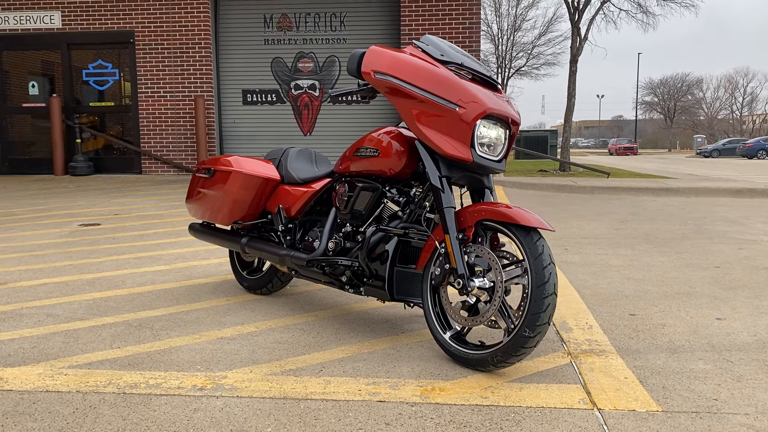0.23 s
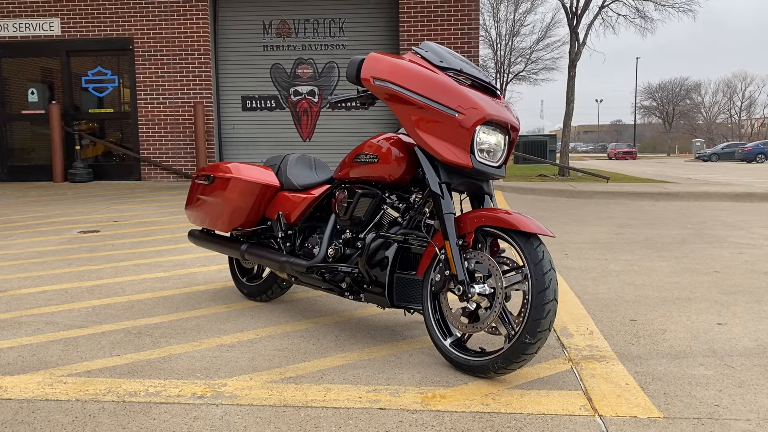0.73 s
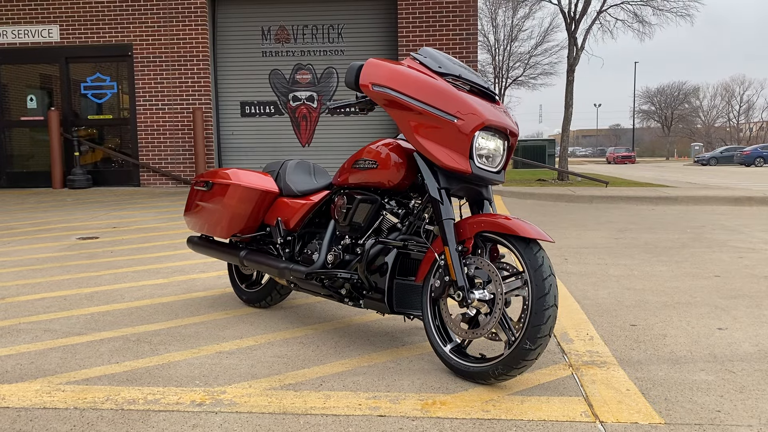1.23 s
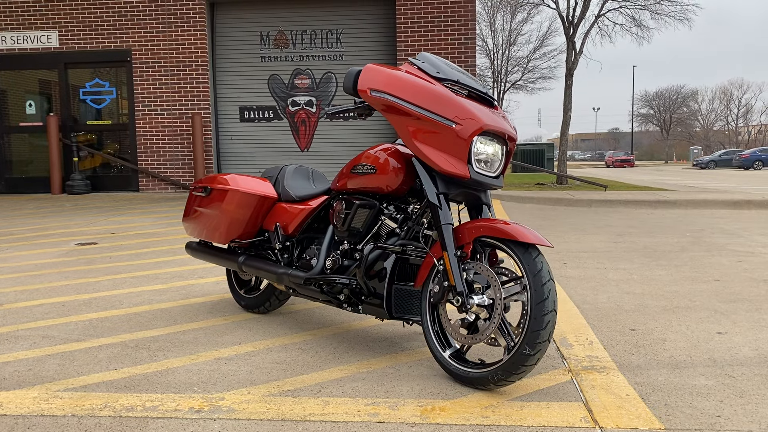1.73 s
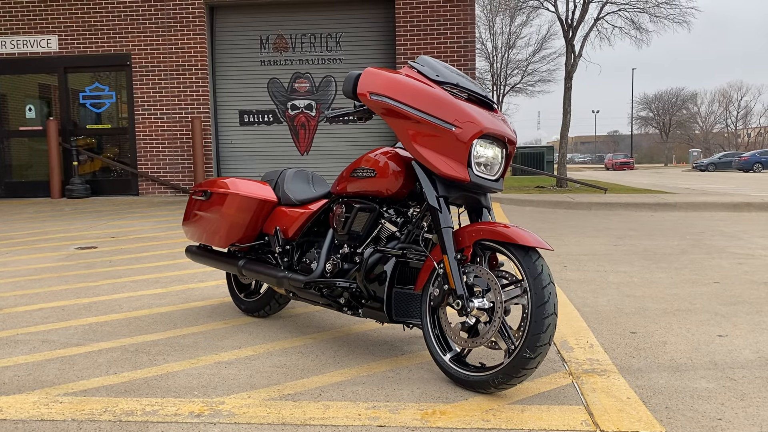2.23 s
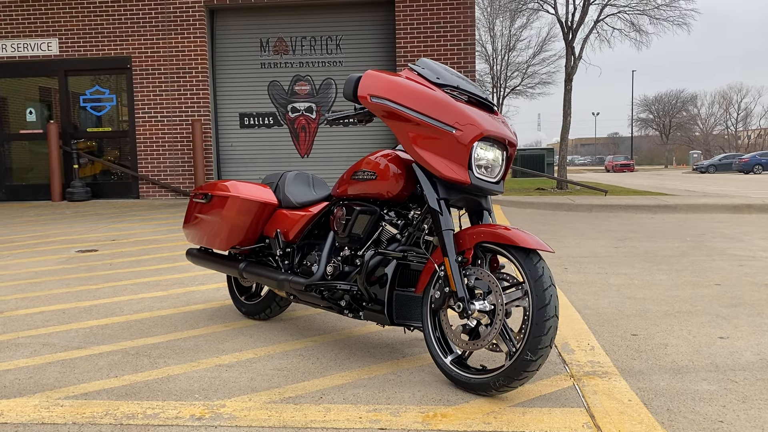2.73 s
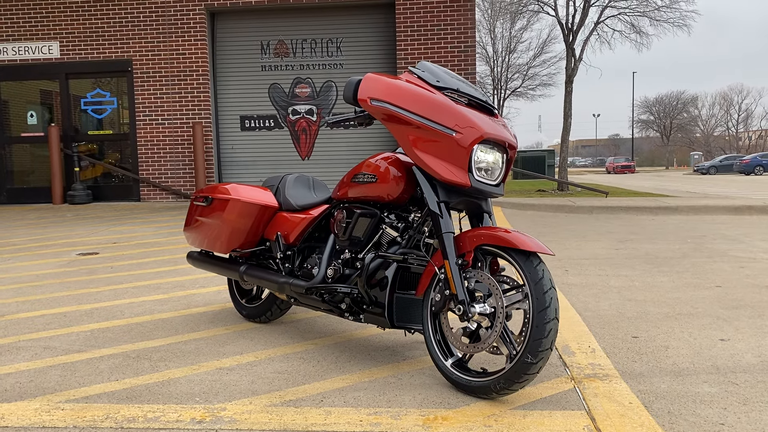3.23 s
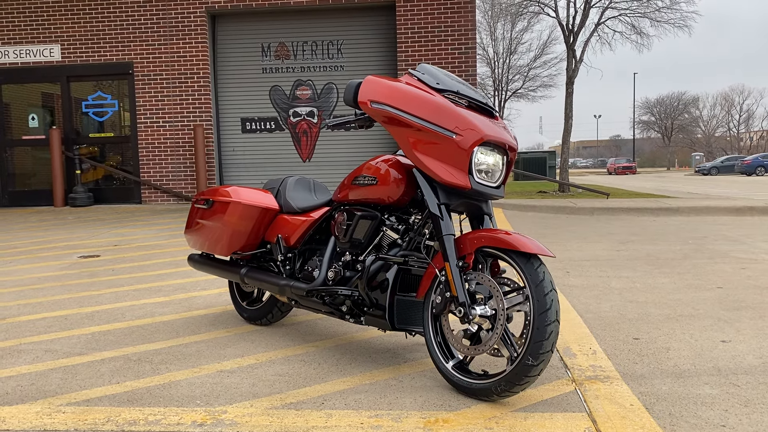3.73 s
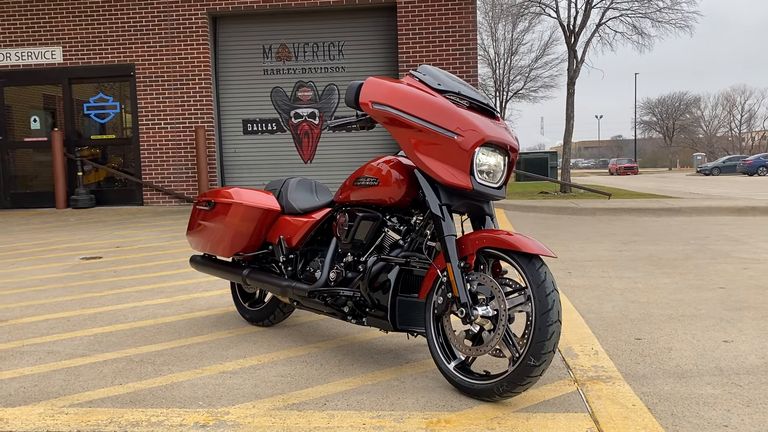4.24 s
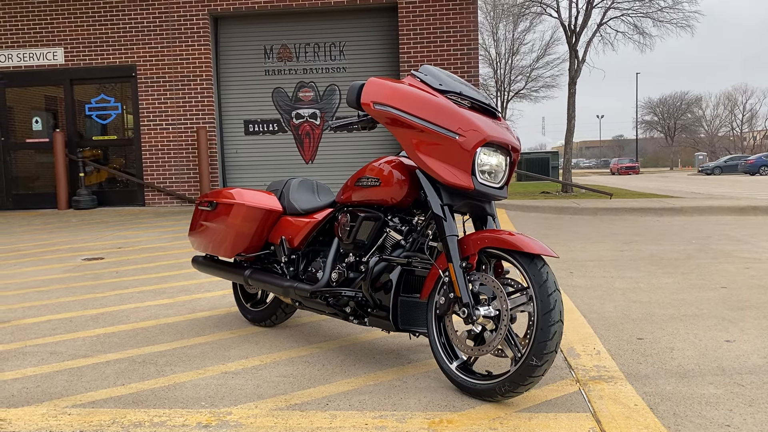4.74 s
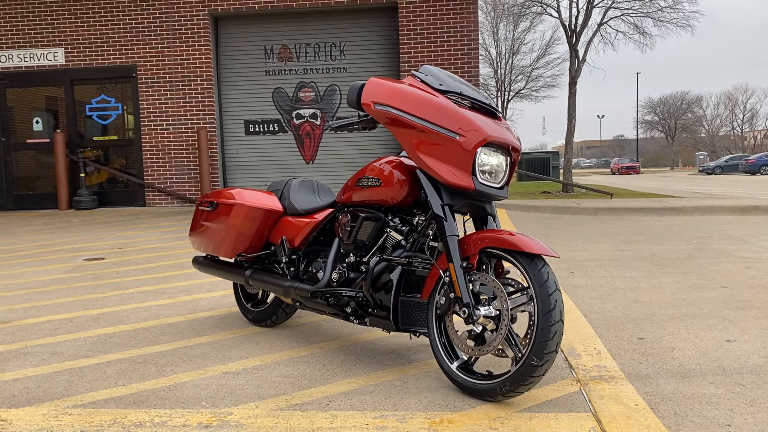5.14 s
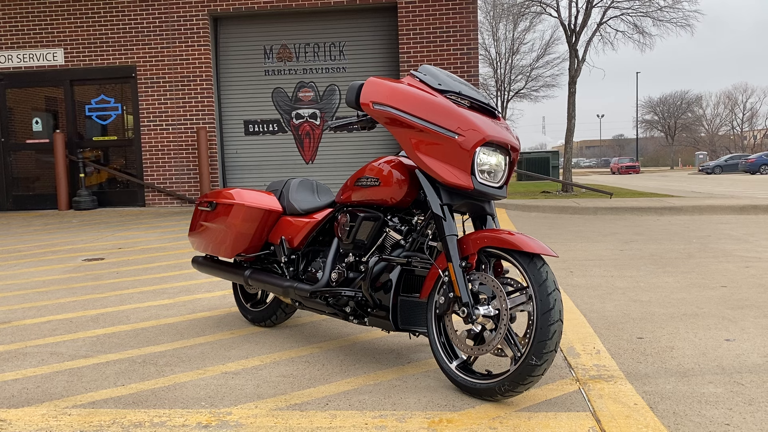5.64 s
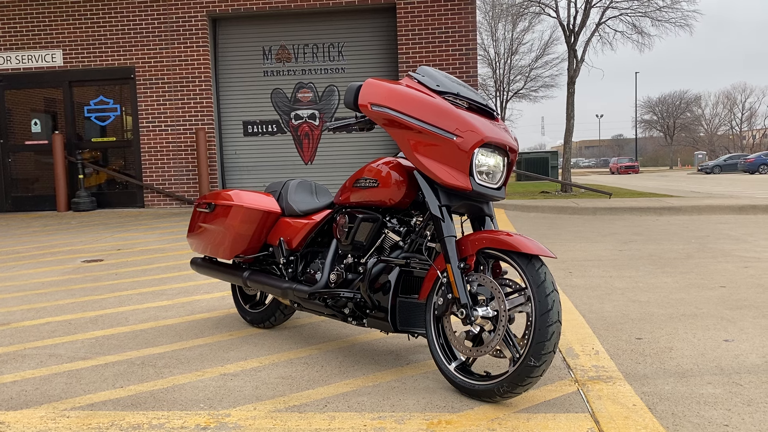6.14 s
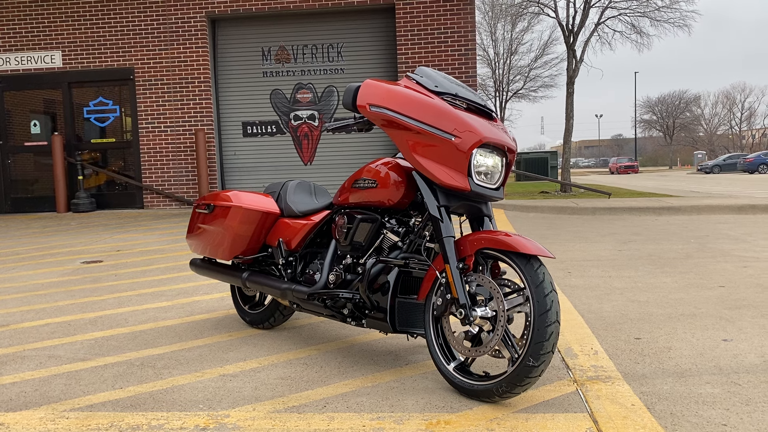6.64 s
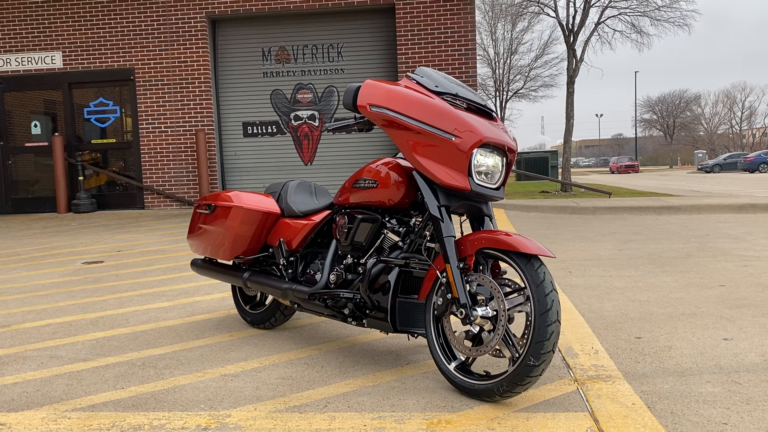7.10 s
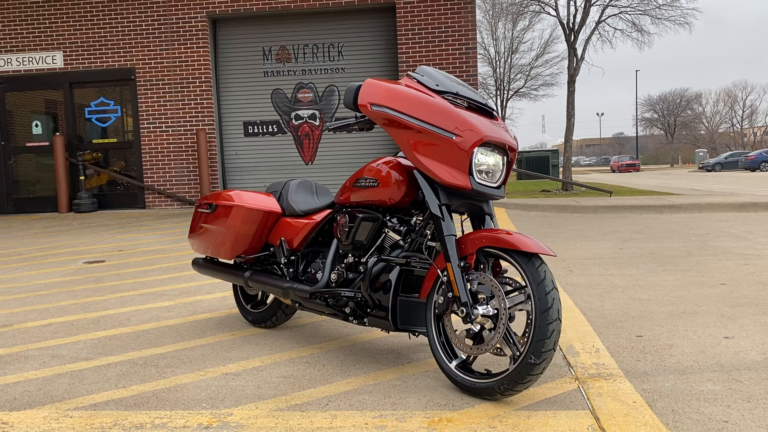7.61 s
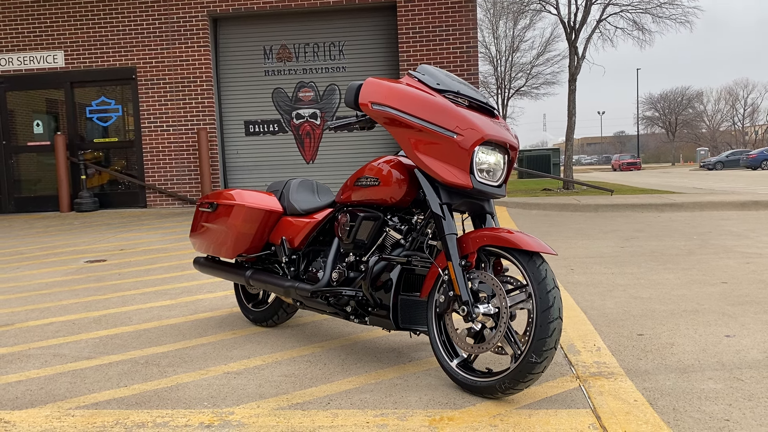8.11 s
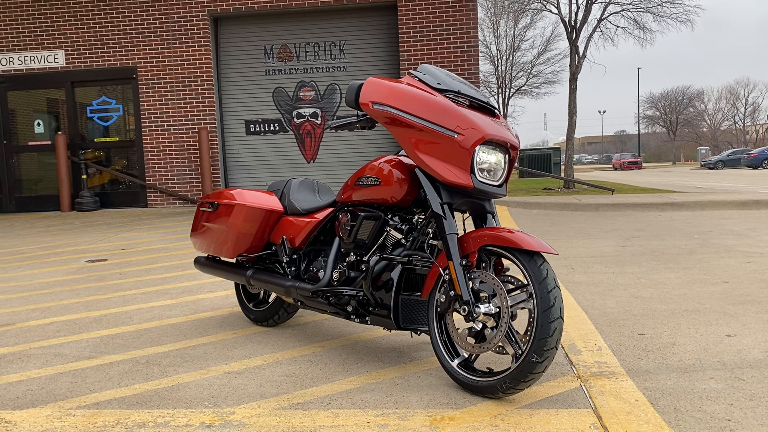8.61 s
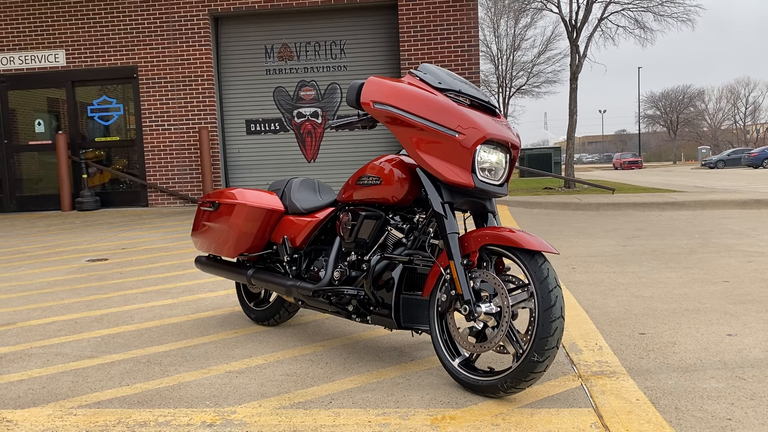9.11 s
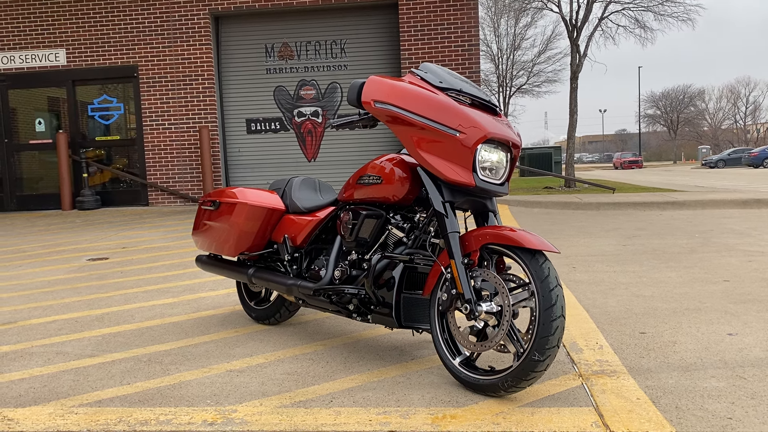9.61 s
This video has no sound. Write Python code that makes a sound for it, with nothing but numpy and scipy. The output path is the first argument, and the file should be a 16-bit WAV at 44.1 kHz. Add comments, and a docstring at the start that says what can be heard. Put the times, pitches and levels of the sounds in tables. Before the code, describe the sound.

From 0 s a large twin-cylinder motorcycle is already idling nearby on an open concrete lot, and it never revs or stops. Two uneven low exhaust pulses repeat about eight and a half times a second, a quick loping throb with slight wandering. Over it sit hollow metallic case knocks, rapid dry valve ticks, occasional sharper bright ticks, grainy hiss and faint rough whines. Breeze rumbles on the stereo microphone, with bass swells and short soft thumps dropping in pitch, swaying left and right; notable buffets come near 1.7, 3 and 4.3 s and thickly from 5 to 5.5 s. At about 5.5 s the bass abruptly thins and the rumble sinks, leaving lighter clatter with weaker thumps. Around 8 s most of the low throb returns, with milder wind swells, and the steady idle continues until the cut at nearly 10 s.

```python
"""A big V-twin motorcycle idles on an open concrete lot, heard at two microphone ports.
All along, two uneven firings a cycle pulse through ringing pipe modes; the cases knock in short resonances,
valve gear ticks in bursts of noise, and the engine hisses and whines. From the start a breeze of band-passed
noise rumbles, bass tones swell, and thumps of falling pitch buffet the ports. At about 5.5 s the bass thins
and the rumble sinks; near 8 s most of the bass comes back and the engine idles on to the end."""
import sys
import numpy as np
from scipy import signal
from scipy.fft import rfft, irfft, next_fast_len
from scipy.io import wavfile
from scipy.ndimage import uniform_filter1d

SR = 44100
rng = np.random.default_rng(int(sys.argv[2]) if len(sys.argv) > 2 else 0)


def digitize_waveform(pressure):
    """Quantize a signal to 16-bit integers and store it at the path in sys.argv[1].

    Rows of a 2-D input are taken as channels; values are limited to [-1, 1].
    """
    field = np.atleast_2d(pressure).T
    bounded = np.clip(field, -1, 1)
    quanta = np.round(bounded * 32767).astype(np.int16)
    wavfile.write(sys.argv[1], SR, quanta)


N = 434804
TIME = np.arange(N) / SR
SIZE = next_fast_len(N + SR // 4, real=True)   # transform length with room for tails

# strength of the breeze on the ports before gusts: (t/s, rumble level/dB, flutter level/dB)
BREEZE = [(0, -23, -30), (.88, -22, -29), (1.26, -22, -28), (1.67, -22, -29), (1.9, -23.5, -32),
          (2.5, -24, -29), (3.0, -22.5, -30), (3.32, -22, -29), (3.75, -19.5, -30), (4.15, -23, -26),
          (4.5, -23, -32), (4.95, -21.5, -33), (5.07, -17.5, -25), (5.51, -26.5, -27.5), (5.55, -31.5, -33),
          (6.04, -29, -41.5), (6.23, -33.5, -50), (6.81, -26.5, -36), (7.85, -33.5, -42.5),
          (8.1, -24, -35.5), (9.86, -24, -31)]


def amp(db):
    """dB to gain."""
    return 10 ** (np.asarray(db) / 20)


def rms_one(x):
    """Scaled to rms 1."""
    return x / np.sqrt(np.mean(x ** 2) + 1e-20)


def in_time(rows):
    """Each column of a table as a curve over all samples."""
    s, *columns = np.transpose(rows)
    return [np.interp(TIME, s, column) for column in columns]


def resonance(x, hz, width_hz):
    """Two-pole band-pass with gain 1 on top."""
    r = np.exp(-np.pi * width_hz / SR)
    poles = [1, -2 * r * np.cos(2 * np.pi * hz / SR), r * r]
    return signal.lfilter([(1 - r * r) / 2, 0, (r * r - 1) / 2], poles, x)


def shaped(x, points):
    """Coloured by (f/Hz, level/dB) points, joined along a logarithmic pitch axis."""
    hz, db = np.transpose(points)
    bins = np.maximum(np.fft.rfftfreq(SIZE, 1 / SR), 1)
    gain = amp(np.interp(np.log(bins), np.log(hz), db))
    return irfft(rfft(x, SIZE) * gain, SIZE)[..., :N]


def band(x, low_hz, high_hz):
    """Butterworth band-pass."""
    return signal.sosfilt(signal.butter(3, [low_hz, high_hz], "band", fs=SR, output="sos"), x)


def cut(order, x, hz, kind="low"):
    """Butterworth low-pass or high-pass."""
    return signal.sosfilt(signal.butter(order, hz, kind, fs=SR, output="sos"), x)


def drift(hz):
    """Random wander with rms 1: noise through two one-pole low-passes at this frequency."""
    r = np.exp(-2 * np.pi * hz / SR)
    wander = signal.lfilter([1], [1, -2 * r, r * r], rng.standard_normal(N + SR))
    return rms_one(wander[SR:])   # the first second lets the filter settle


def crank_cycles():
    """The crank turns at a steady idle plus a slow hunting that runs it ahead by part of a cycle."""
    cycles_per_s = 8.44
    # idle hunting: (t/s, lead over a steady idle/cycles)
    hunting = [(0, .109), (.38, .13), (.96, .064), (1.44, .128), (2.16, .102), (2.4, .078), (2.64, .105),
               (3.24, .094), (3.6, .048), (4.1, .104), (4.8, .085), (5.28, .088), (5.6, .108), (6.3, .101),
               (6.8, .132), (7.75, .072), (8.85, .134), (9.36, .119), (9.86, .162)]
    return cycles_per_s * TIME + in_time(hunting)[0]


CYCLE = crank_cycles()


def each_cycle(fraction, spread_db, jitter_s):
    """One click a cycle at a crank position, uneven in strength and time."""
    chance = rng.standard_normal((int(CYCLE[-1]) + 1, 2))
    s = np.interp(np.arange(len(chance)) + fraction, CYCLE, TIME, left=-1, right=-1)
    s = s + jitter_s * chance[:, 0]
    heard = (s > 0) & (s < TIME[-1])
    clicks = np.full(N, 1e-18)   # a trace above zero keeps the filters fast
    clicks[(s[heard] * SR).astype(int)] = amp(spread_db * chance[heard, 1])
    return clicks


def exhaust():
    """Each firing sends a soft pulse into the pipe resonances; neighbouring modes start with opposite sign."""
    level_db, spread_db, jitter_s, pulse_cut_hz = -18.8, 1.1, .0006, 350
    # two cylinders about 310 degrees apart: (position/cycle, level/dB)
    firings = [(.975, 0), (.401, -3.5)]
    # exhaust pipe modes: (f/Hz, width/Hz, level/dB)
    pipe_modes = [(38, 4, -3), (58.6, 5.9, 0), (94, 8.9, -5.8), (118.2, 4, -14)]
    clicks = sum(amp(db) * each_cycle(at, spread_db, jitter_s) for at, db in firings)
    pulses = cut(2, clicks, pulse_cut_hz)
    modes = [amp(db) * resonance(pulses, hz, width_hz) for hz, width_hz, db in pipe_modes]
    return amp(level_db) * rms_one(sum(modes[::2]) - sum(modes[1::2]))


def knocks():
    """Soft blows inside the cases: each swells and dies in one mode, so the resonance acts twice."""
    # blows and the modes they strike: (position/cycle, f/Hz, width/Hz, level/dB)
    case_blows = [(.205, 491, 50, -25.5), (.71, 493, 62, -33.5), (.55, 493, 62, -37), (.35, 595, 60, -34.5),
                  (.52, 595, 70, -34.5), (.97, 595, 70, -37), (.68, 595, 70, -38), (.96, 740, 80, -32.5),
                  (.4, 740, 100, -32), (.83, 740, 80, -36.5), (.97, 880, 80, -37.5), (.14, 880, 80, -38.5),
                  (.75, 880, 80, -39.5), (.74, 1150, 90, -35), (.15, 1150, 90, -40),
                  (.27, 1480, 110, -37.5), (.3, 1850, 120, -41), (.04, 1850, 120, -44.5),
                  (.16, 1850, 120, -41.5), (.29, 2350, 130, -41.5)]
    # a blow rings flat and short, true and long, or sharp: (pitch ratio, width ratio)
    detunings = [(.98, 1.1), (1, .85), (1.02, 1)]
    out = 0
    for at, hz, width_hz, db in case_blows:
        blow = each_cycle(at, spread_db=1.6, jitter_s=0.00159)
        choices = rng.integers(0, len(detunings), int(CYCLE[-1]) + 1)
        dealt = choices[CYCLE.astype(int)]   # one detuning for each cycle
        peak = 2 * np.pi * width_hz / SR / np.e   # height of the double resonance's ring after a unit click
        for k, (ratio, broad) in enumerate(detunings):
            ring = blow * (dealt == k) + 1e-18
            for _ in range(2):
                ring = resonance(ring, hz * ratio, width_hz * broad)
            out = out + amp(db) / peak / np.sqrt(broad) * ring
    return out


def valve_ticks(noise):
    """Every valve contact lets through a burst of noise, uneven in each band on its own."""
    # valve contacts: (position/cycle, decay/s, then level/dB against the noise in each tick band)
    contacts = [(.96, .015, -3, -1, -1), (.03, .006, -4, 6, 1), (.17, .008, -3, 2, 0), (.29, .012, 5, 9, 9),
                (.44, .015, -4, -3, -3), (.57, .011, 2, 8, 8), (.735, .008, -1, 2, -3),
                (.9, .006, -9, 3, 10)]
    # tick bands: (low f/Hz, high f/Hz)
    tick_bands = [(2600, 7200), (7200, 12500), (12500, 16500)]
    bursts = 0
    for k, (low_hz, high_hz) in enumerate(tick_bands):
        gate = 0
        for at, decay_s, *db in contacts:
            clicks = amp(db[k]) * each_cycle(at, spread_db=2.4, jitter_s=0.0045)
            gate = gate + signal.lfilter([1], [1, -np.exp(-1 / (decay_s * SR))], clicks)
        gate = uniform_filter1d(gate, size=130, origin=64)   # the burst takes three milliseconds to rise
        bursts = bursts + band(gate * noise, low_hz, high_hz)
    return bursts


def sharp_ticks():
    """Hard contacts give brief bright bursts: chosen loud ones, and weak uneven ones every cycle."""
    decay_s, hard_db, hard_spread_db = 0.011, -56, 3.5
    # the sharpest single ticks: (t/s, level/dB)
    single_ticks = [(0.855, -46), (1.1278, -43), (1.2391, -41), (2.277, -43), (2.5461, -41), (3.3423, -44),
                    (3.4645, -42), (4.5585, -42), (5.6231, -45), (6.5695, -43), (7.25, -43), (7.4889, -44),
                    (8.8189, -44), (9.4135, -42)]
    # crank positions of the weaker hard contacts: position/cycle
    hard_positions = (.29, .58)
    s, db = np.transpose(single_ticks)
    clicks = amp(hard_db) * sum(each_cycle(at, hard_spread_db, jitter_s=0.0015) for at in hard_positions)
    clicks[(s * SR).astype(int)] = amp(db)
    gate = signal.lfilter([1], [1, -np.exp(-1 / (decay_s * SR))], clicks)
    return gate * rms_one(band(rng.standard_normal(N), 6000, 12800))


def engine_whines():
    """Narrow resonances turn noise into rough tones and ringing bands, each rattling in strength on its own."""
    waver_db, waver_hz = 2.5, 18
    # noisy tones and ringing bands: (f/Hz, width/Hz, level/dB)
    tones = [(737, 20, -49), (1062, 25, -51), (1165, 20, -48.5), (1200, 120, -46.5), (1860, 120, -48),
             (2432, 60, -52), (3806, 50, -64), (4195, 20, -63), (5655, 50, -67), (6000, 15, -75),
             (6255, 55, -68)]
    white = rng.standard_normal((2, N))
    out = 0
    for hz, width_hz, db in tones:
        rattling = white * amp(waver_db * drift(waver_hz))
        out = out + amp(db) * rms_one(resonance(rattling, hz, width_hz))
    return out


def swelling(hiss):
    """Lumpy lowest hiss, then ranges split by low-passes that each swell and sink on their own."""
    deep_hz, deep_swell_db, deep_swell_hz = 380, 3, 14
    swell_db, swell_hz = 1.2, 20
    deep = cut(2, hiss, deep_hz)
    rest = hiss + deep * (amp(deep_swell_db * (drift(deep_swell_hz) - .5)) - 1)
    out = 0
    for split_hz in (700, 1400, 2800):
        low = cut(1, rest, split_hz)
        out = out + low * amp(swell_db * drift(swell_hz))
        rest = rest - low
    return out + rest * amp(2.5 * drift(23.0))   # the top range swells more than the middle ranges


def clatter():
    """Swelling hiss, valve bursts cut from a second hiss, and whines; two unrelated strands of each."""
    # colour of engine hiss and clatter: (f/Hz, level/dB per Hz before swells and bursts)
    hiss_colour = [(150, -54), (330, -63), (480, -61.5), (600, -61.5), (900, -64), (1100, -66.5),
                   (1420, -67), (1560, -66), (1720, -72), (1850, -69.5), (2250, -74), (2700, -82),
                   (4200, -83), (5000, -88.5), (6800, -97), (7300, -93), (7800, -90.5), (8500, -90.5),
                   (9600, -94.5), (11000, -96), (12200, -92), (13000, -98.5), (15700, -105)]
    white = rng.standard_normal((2, 2, N)) * np.sqrt(SR / 2)   # unit density per Hz
    hiss, spare = shaped(white, hiss_colour)
    return swelling(hiss) + valve_ticks(spare) + engine_whines()


def ports(shared, own):
    """Sound reaches the two ports by different paths: a common part shifted in phase, and a part that differs."""
    # the two ports: (f/Hz, likeness 0-1, phase by which left leads/rad, left over right level/dB)
    port_paths = [(170, .8, -.4, -.5), (330, .7, -.7, 1), (520, .58, .5, -1.8), (860, .72, 1.7, 1.9),
                  (1200, .35, 2.0, 1.0), (1550, .55, 3.6, -1.0), (1900, .35, 7.3, -1.9),
                  (2300, .68, 6.6, -.8), (3900, .68, 8.6, -1.8), (4500, .35, 8.1, -2.1),
                  (5300, .3, 8.4, 2.5), (5700, .4, 10.6, 4.5), (6400, .63, 11.8, 1.2),
                  (7000, .35, 11.2, .9), (7500, .7, 10.1, .5), (8000, .95, 9.5, -.2), (8600, .92, 9.1, -.3),
                  (10300, .85, 6.7, 0), (15800, .88, 0, 0)]
    hz, *columns = np.transpose(port_paths)
    bins = np.fft.rfftfreq(SIZE, 1 / SR)
    alike, lead, left_db = [np.interp(bins, hz, column) for column in columns]
    alike, side = np.clip(alike, 0, 1), np.array([[1], [-1]])
    both = np.sqrt(1 + alike) * rfft(shared, SIZE) + side * np.sqrt(1 - alike) * rfft(own, SIZE)
    both = both * amp(side * left_db / 2) * np.exp(side * .5j * lead)
    return irfft(both, SIZE)[:, :N] / np.sqrt(2)


def surges():
    """The bass surges: a short tone under a bell-shaped swell, dipping before it rises."""
    spread_s, early_s, turn = .009, .003, -.2   # bell width, its lead, tone phase at the listed time in turns
    # bass surges: (t/s, level/dB, f/Hz, left over right level/dB)
    bass_lumps = [(0.405, -10, 82, 1), (0.447, -14, 109, -1), (0.471, -10, 75, 2), (0.523, -11, 109, -2),
                  (0.704, -5, 75, 1), (0.76, -9, 68, -1), (0.83, -10, 62, 6), (0.901, -12, 82, 0),
                  (0.988, -14, 99, 0), (1.042, -12, 68, -4), (1.077, -9, 68, -1), (1.126, -10, 90, -1),
                  (1.179, -7, 68, -2), (1.28, -15, 120, -1), (1.485, -8, 62, -3), (1.66, -11, 62, 2),
                  (1.759, -8, 62, -2), (1.86, -12, 82, -2), (2.035, -14, 120, -2), (2.457, -13, 82, 2),
                  (2.495, -9, 68, 3), (2.698, -7, 82, 1), (2.721, -12, 99, -1), (3.07, -11, 90, 1),
                  (3.319, -4, 68, -2), (3.451, -5, 68, -1), (3.496, -13, 99, -1), (3.517, -10, 62, -1),
                  (3.655, -10, 75, -1), (3.738, -9, 62, -3), (4.01, -8, 62, -1), (4.079, -11, 99, 2),
                  (4.278, -6, 75, 0), (4.346, -10, 68, 2), (4.725, -8, 82, -1), (4.782, -10, 62, -3),
                  (4.864, -12, 68, -1), (5.059, -3, 75, 0), (5.111, -12, 62, -5), (5.14, -9, 68, 1),
                  (5.221, -8, 68, 0), (5.264, -11, 82, 2), (5.324, -11, 75, 1), (5.408, -8, 62, 2),
                  (5.476, -12, 109, 3), (5.513, -11, 82, -1), (5.753, -19, 62, -2), (5.828, -20, 68, -1),
                  (5.869, -23, 109, -1), (5.916, -18, 90, 1), (5.975, -20, 120, 2), (6.039, -17, 82, 1),
                  (6.068, -21, 120, 0), (6.121, -21, 68, 2), (6.324, -20, 75, -1), (6.387, -18, 68, -1),
                  (6.559, -19, 62, -1), (6.631, -16, 75, -2), (6.654, -22, 90, -1), (6.754, -15, 62, 1),
                  (6.792, -22, 90, -2), (6.813, -18, 68, -3), (6.934, -16, 62, -3), (6.966, -18, 75, 0),
                  (7.092, -21, 90, 0), (7.124, -19, 62, -1), (7.157, -19, 99, 1), (7.225, -19, 68, -2),
                  (7.493, -20, 62, -1), (7.761, -18, 62, -2), (7.829, -19, 62, -6), (7.943, -17, 75, 3),
                  (8.103, -15, 99, 1), (8.144, -13, 75, 2), (8.182, -15, 75, -4), (8.203, -14, 62, -6),
                  (8.231, -15, 99, -2), (8.252, -12, 62, 0), (8.413, -14, 90, 0), (8.493, -16, 75, 2),
                  (8.561, -14, 68, -2), (8.593, -11, 62, 1), (9.001, -13, 68, -1), (9.119, -12, 75, -3),
                  (9.147, -13, 109, 0), (9.248, -12, 62, -5), (9.366, -12, 62, 0), (9.567, -12, 75, 2),
                  (9.592, -13, 62, -2), (9.643, -17, 109, -2), (9.713, -16, 90, -3), (9.808, -16, 75, -3)]
    out, t = np.zeros((2, N + SR)), np.arange(-SR // 25, SR // 25) / SR
    for s, db, hz, left_db in bass_lumps:
        bell = np.exp(-.5 * ((t + early_s) / spread_s) ** 2)
        lump = np.sin(2 * np.pi * (hz * t + turn)) * bell
        start = int((s + t[0]) * SR)
        out[:, start:start + len(t)] += amp(db) * lump * amp([[left_db / 2], [-left_db / 2]])
    return out[:, :N]


def buffets():
    """An eddy bursts on the ports: a short thump that falls in pitch, not quite in step left and right."""
    end_hz, fall_s, t60_s, rise_s = 95, .004, .055, .008
    rough, rough_hz = .42, 120   # depth and speed of the flutter in a thump
    # the strongest buffets: (t/s, level before decay/dB, left over right level/dB, fall in pitch/Hz)
    strong_buffets = [(1.497, -9, 2, 460), (1.549, -17, -1, 460), (1.733, -2, 1, 476), (3.065, -5, -3, 470),
                      (3.309, -6.5, 3, 404), (3.642, -10, -1, 443), (3.681, -21, 0.5, 460),
                      (3.998, -1, 5, 462), (4.132, -3, 0, 350), (4.147, -10, 6, 402), (4.188, -19, 5, 330),
                      (4.243, -14, 0, 400), (4.269, 3.5, 1, 420), (4.65, -3.5, -2, 464),
                      (5.036, -6, -1, 384), (5.045, 2.5, 1, 850), (5.108, -19, -2, 460), (5.21, -5, 7, 357),
                      (5.263, -7, 3, 382), (5.385, -7, -10, 464), (5.402, 2.5, 1, 510), (5.455, 1, 4, 513),
                      (5.699, -10.5, 2, 460), (5.735, -7.5, 2, 456), (5.907, -11, 2, 460),
                      (5.964, -19, 1.5, 400), (6.03, -13, 4, 830), (6.06, -10.5, 2, 550),
                      (6.3, -16, 1, 414), (6.526, -11, 0.0, 455), (6.558, -16, 0, 593), (6.62, -12, 7, 354),
                      (6.65, -11, 2, 455), (6.765, -11, 5, 550), (6.824, -9, 7, 547), (6.859, -12, 0, 350),
                      (6.955, -18, 7, 397), (7.078, -15, -.5, 420), (7.347, -28, -5, 500)]
    out, t = np.zeros((2, N + SR)), np.arange(SR // 5) / SR
    rise = np.sin(np.pi / 2 * np.minimum(t / rise_s, 1)) ** 2
    rows = strong_buffets + small_buffets()
    for (s, db, left_db, fall_hz), (turn, skew) in zip(rows, rng.random((len(rows), 2))):
        hz = end_hz + fall_hz * np.exp(-t / fall_s)
        turns = np.cumsum(hz) / SR + turn + 0.23 * (skew - .5) * np.array([[1], [-1]])
        thump = np.sin(2 * np.pi * turns) * rise * amp(db - 60 * t / t60_s)
        start = int(s * SR)
        out[:, start:start + len(t)] += thump * amp([[left_db / 2], [-left_db / 2]])
    return out[:, :N] * (1 + rough * drift(rough_hz))


def small_buffets():
    """Weaker eddies come at random moments, following the breeze in level: rows like the strongest buffets."""
    per_s, fall_hz = 6, 400
    over_flutter_db, spread_db, sway_db = 7, 2, 4
    count = int(per_s * TIME[-1])
    s = TIME[-1] * rng.random(count)
    level, sway = rng.standard_normal((count, 2)).T
    db = np.interp(s, TIME, in_time(BREEZE)[1]) + over_flutter_db + spread_db * level
    return list(zip(s, db, sway_db * sway, np.full(count, fall_hz)))


def breeze():
    """Lumpy turbulence in gusts: rumble partly its own at each port, flutter alike, swaying side to side."""
    gust_db, gust_hz, lump_db = 1.5, 4.8, 3
    left_mean_db, sway_db, sway_hz = -1.4, 3.5, 3.6
    rumble_alike = 0.73   # likeness at the two ports, 0-1
    rumble_db, flutter_db = in_time(BREEZE) + gust_db * drift(gust_hz)
    left_db = left_mean_db + sway_db * drift(sway_hz)
    rumble = rms_one(band(rng.standard_normal((2, N)), 34, 107.6)) * amp(rumble_db + lump_db * drift(45))
    flutter = rms_one(band(rng.standard_normal(N), 101, 235.5)) * amp(flutter_db + lump_db * drift(22.0))
    mid = rumble[0] + flutter
    side = np.sqrt((1 - rumble_alike) / (1 + rumble_alike)) * rumble[1]
    return np.array([mid + side, mid - side]) * amp([left_db / 2, -left_db / 2])


def left_late(x):
    """The bass reaches the left port last, a fraction of a millisecond behind."""
    lag_s = .00035
    return np.array([np.interp(TIME - lag_s, TIME, x[0]), x[1]])


def scene():
    """Engine through the ports, its bass thinned for a while, with the surges and the breeze."""
    thin_hz, thin_exhaust_db, low_mids_top_hz = 155, -13, 900
    # the engine's low mids swell and sink slowly: (t/s, level/dB)
    low_mid_levels = [(0, 0.6), (2, 1.1), (3.5, 0.5), (5, 0.3), (6.3, -2.5), (6.8, 0.5), (7.6, -6.5),
                      (8.5, 1.5), (9.86, -0.5)]
    # thinning of the bass: (t/s, share of bass removed 0-1)
    thinning = [(0, 0), (5.51, 0), (5.56, 1), (7.88, 1), (8.08, .1), (9.86, .08)]
    shared, own = clatter()
    cases = ports(shared + knocks() + sharp_ticks(), own)
    low_mids = cut(1, cases, low_mids_top_hz)
    cases = cases + (amp(in_time(low_mid_levels)[0]) - 1) * low_mids
    thin = cut(2, cases, thin_hz, "high")
    share = in_time(thinning)[0]
    pipe = exhaust() * amp(thin_exhaust_db * share + [[-.5], [.5]])   # a little stronger on the right
    bass = left_late(pipe + breeze() + buffets() + surges())
    return share * thin + (1 - share) * cases + bass


def record(dry):
    """The microphone drops the deepest bass, the highest peaks are rounded, the top is cut."""
    port_cut_hz, ceiling, top_hz = 67, .95, 15790
    x = cut(2, dry, port_cut_hz, "high")
    x = x / (1 + (x / ceiling) ** 4) ** .25
    return signal.sosfilt(signal.ellip(14, .5, 70, top_hz, fs=SR, output="sos"), x)


dry = scene()
out = record(dry)
digitize_waveform(out)
```